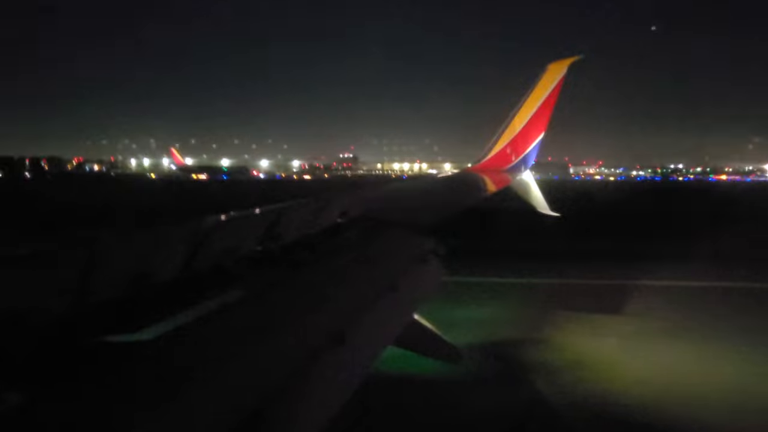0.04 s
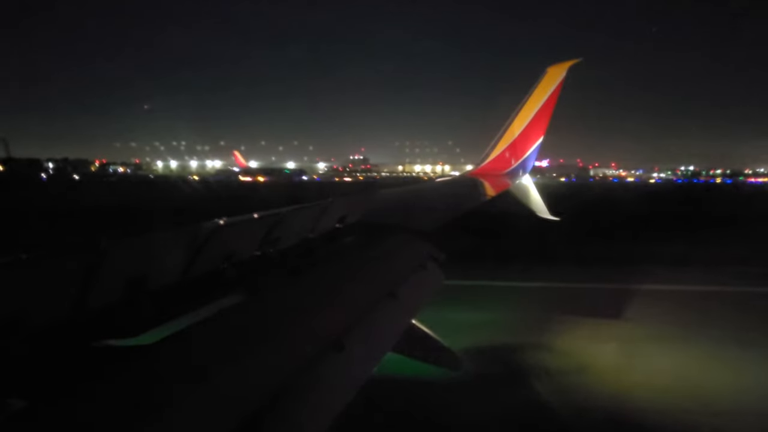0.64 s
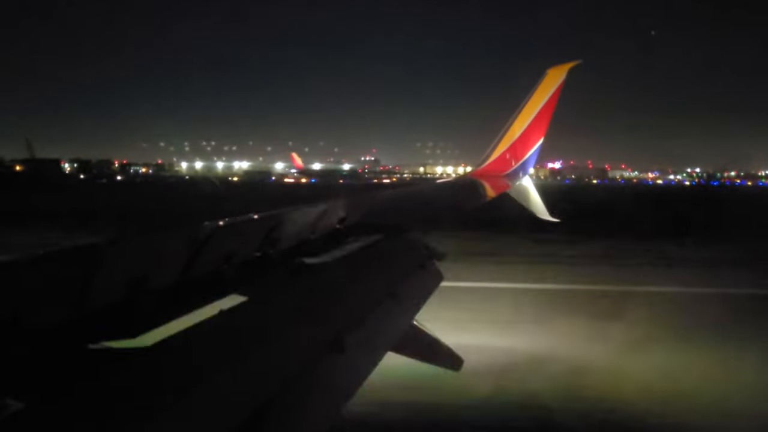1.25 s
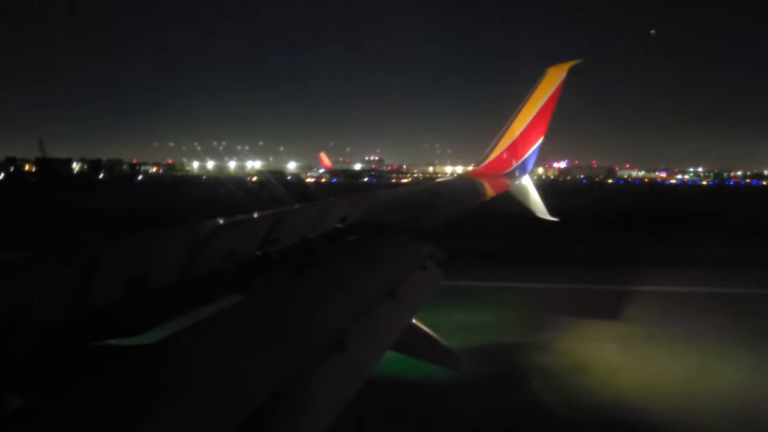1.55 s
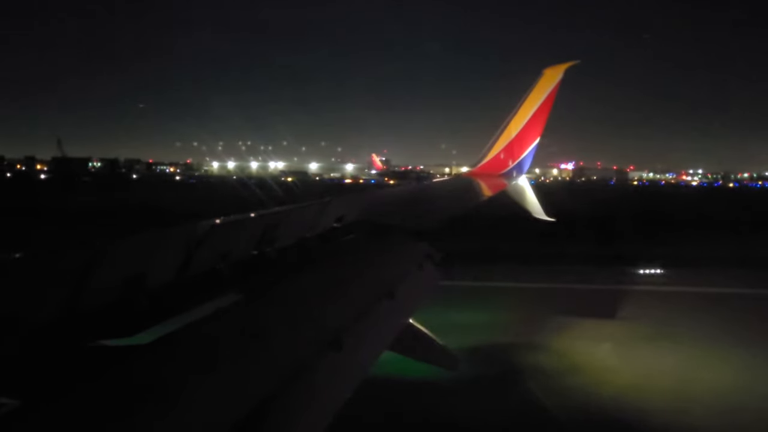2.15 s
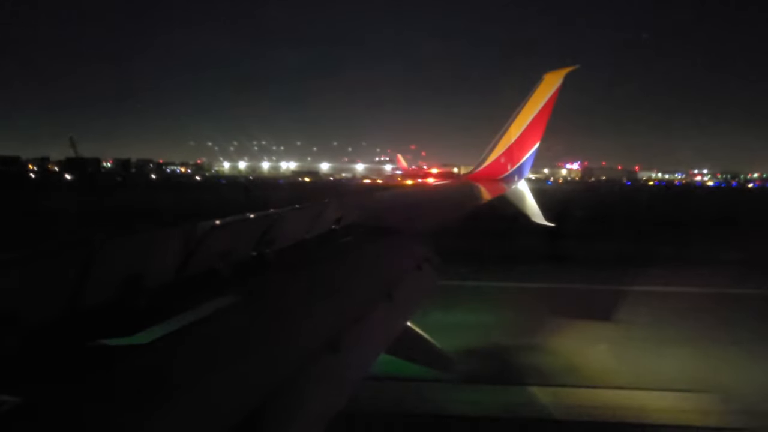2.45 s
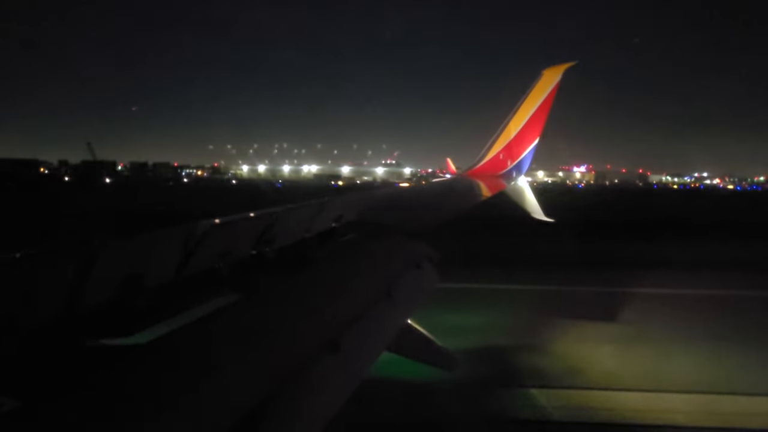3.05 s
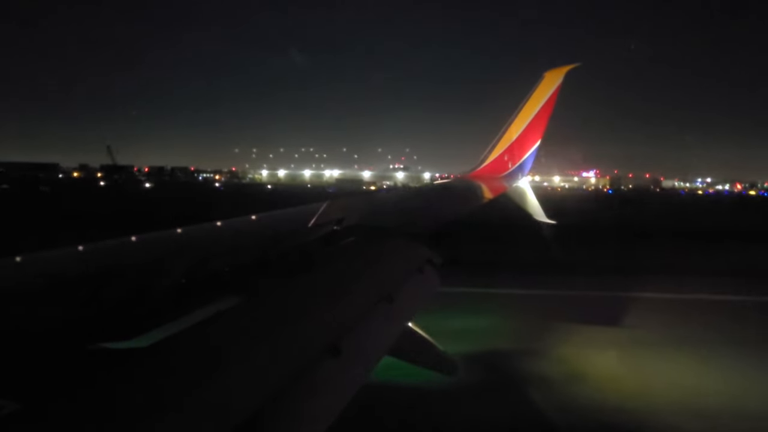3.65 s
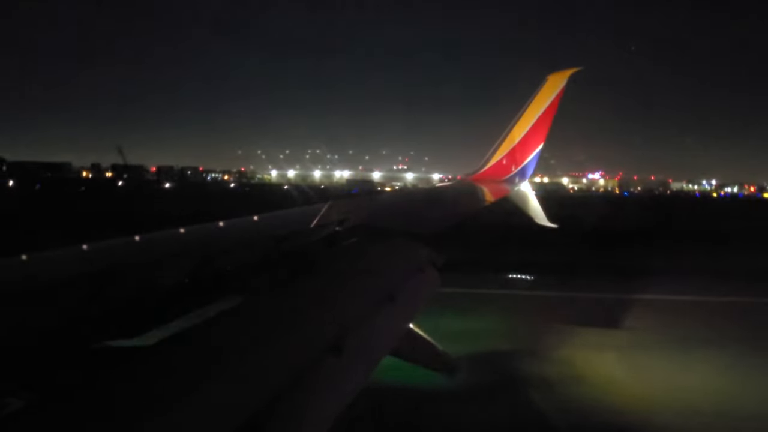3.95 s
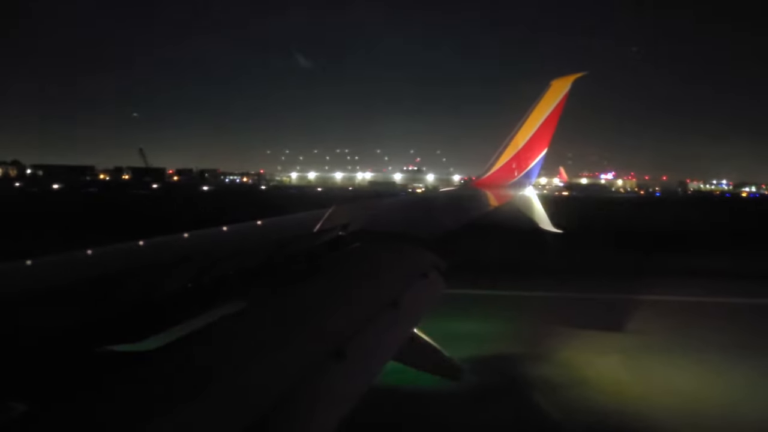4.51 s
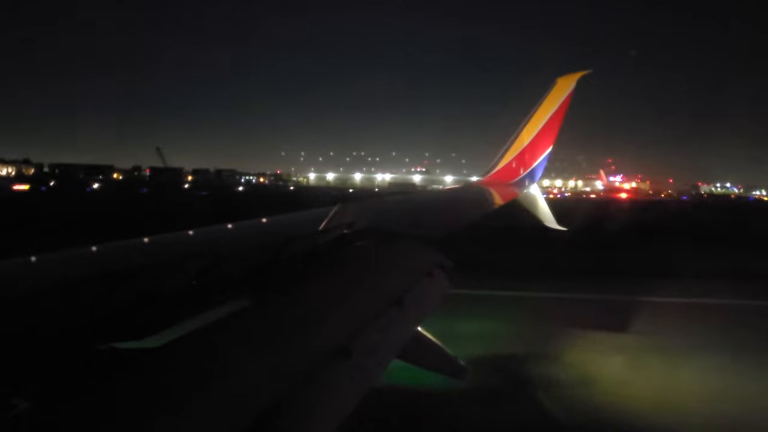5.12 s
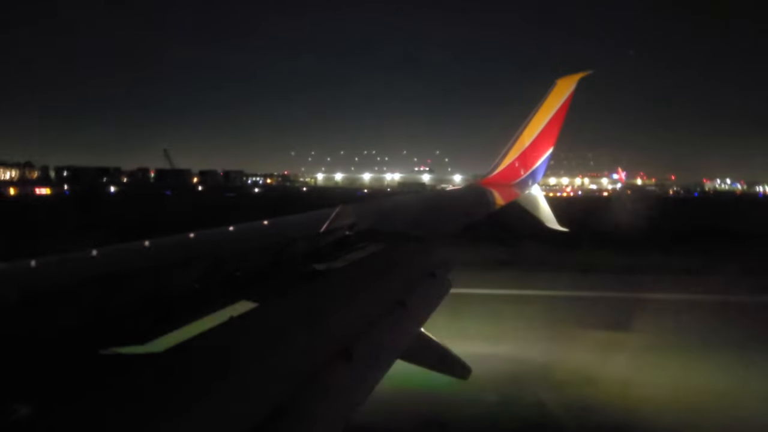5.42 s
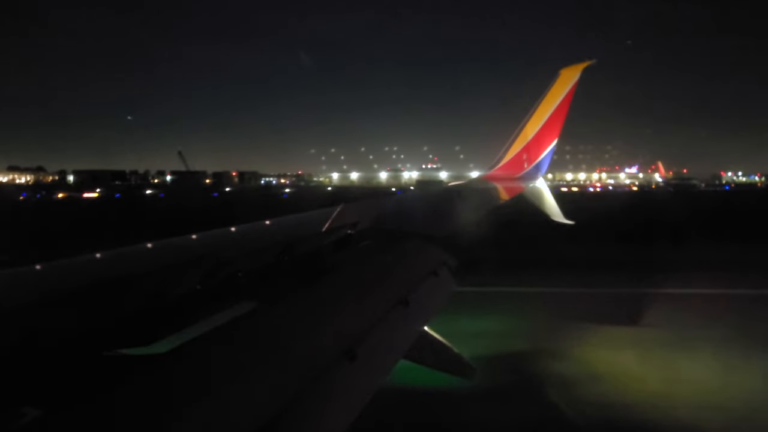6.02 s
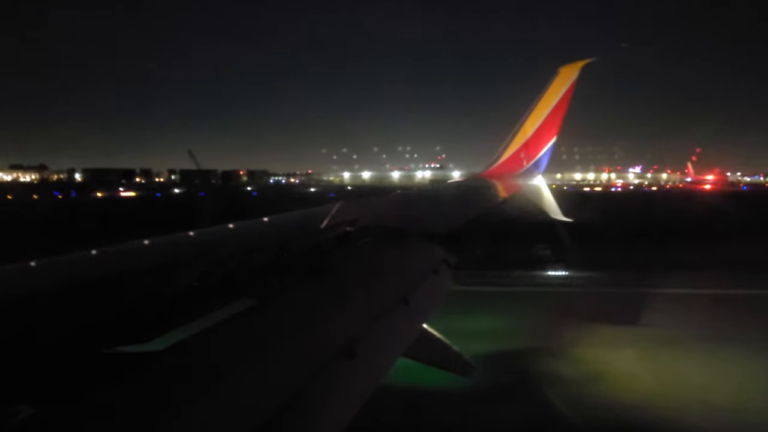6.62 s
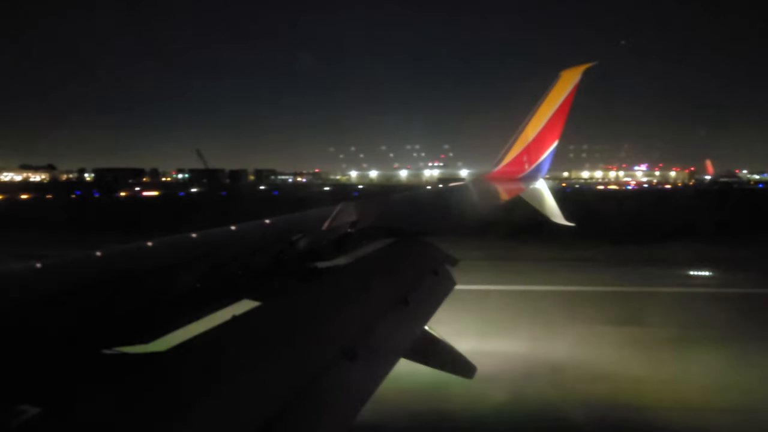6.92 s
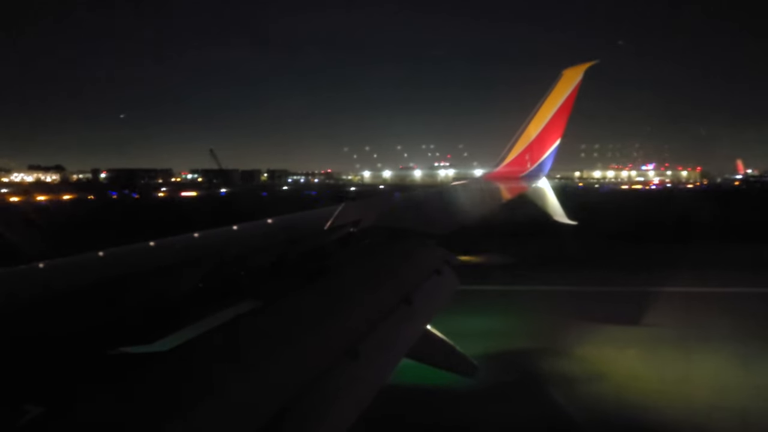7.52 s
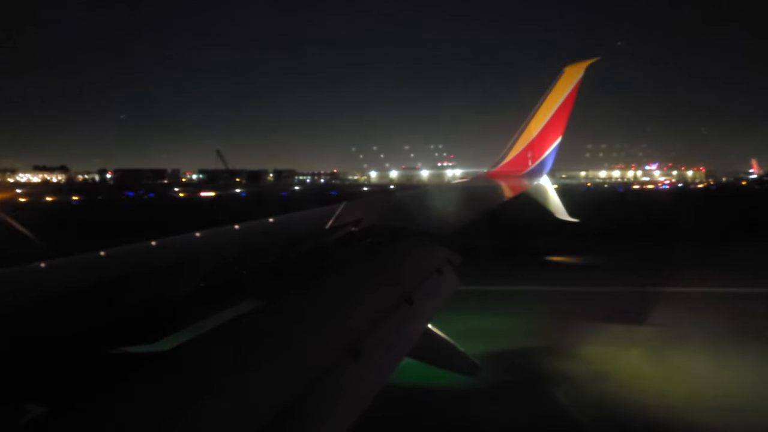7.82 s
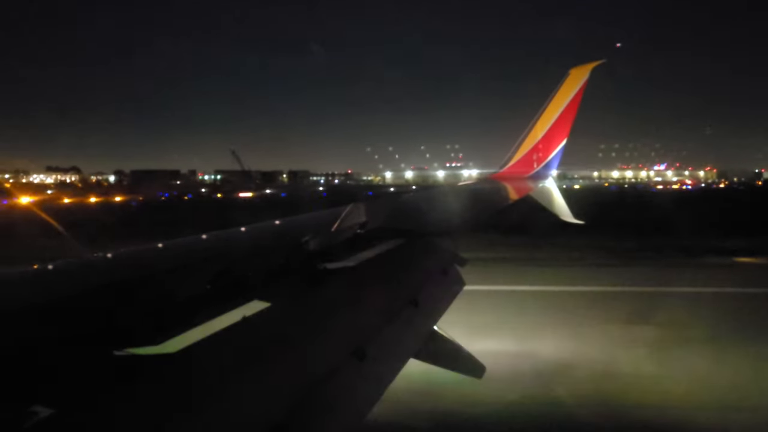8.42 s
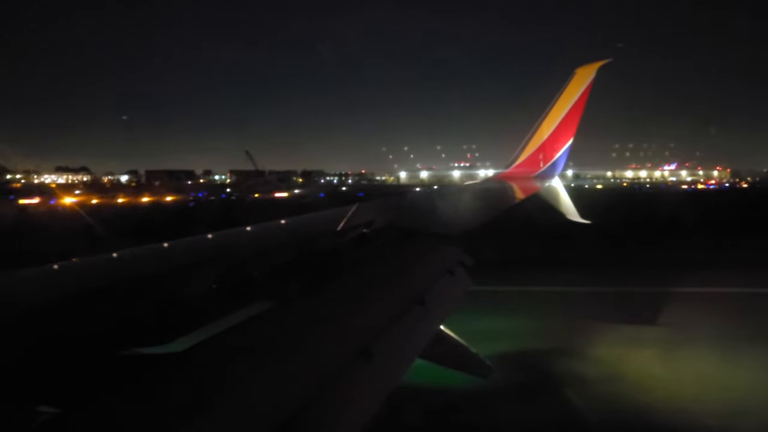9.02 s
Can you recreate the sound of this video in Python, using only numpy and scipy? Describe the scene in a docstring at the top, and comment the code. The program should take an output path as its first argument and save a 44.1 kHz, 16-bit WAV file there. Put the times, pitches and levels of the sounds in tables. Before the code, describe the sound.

A loud, deep wheel rumble and jet engine roar fill an airliner cabin from the start, heard from a seat over the wing as it rolls out after landing. Softer rushing air and vent hiss lie underneath. The rumble continues for all nine seconds or so, swelling briefly over bumps at about 0.6, 2.5, 6, 8 and 8.4 seconds. The roar holds until about 2.6 seconds, then sinks gradually, more clearly after 6 seconds. Meanwhile a low engine fan drone builds between 2 and 4 seconds and stays, swelling and dipping, with a marked dip near 7.7 seconds. Very faint rustles, ticks and short rattles come from the cabin trim throughout, with one tiny creak near 3.8 seconds. A barely audible airy whistle fades in from 5 seconds, and two faint machine hums join at around 8 seconds.

```python
"""Wheel rumble and engine roar, heard from a seat over the wing of a jet airliner rolling out after landing.
The runway shakes the floor; the exhaust roar sinks with the thrust, uncovering the drone of the fans.
Air hisses along the skin and from the vents. The trim rustles, ticks and rattles as the airframe shakes.
A faint whistle and two hums come up toward the end."""
import sys
import numpy as np
from scipy import signal
from scipy.fft import rfft, irfft
from scipy.io import wavfile
from scipy.ndimage import uniform_filter1d, minimum_filter1d

SR = 44100
rng = np.random.default_rng(int(sys.argv[2]) if len(sys.argv) > 2 else 0)


def wrap_up_sound(samples):
    """Save the sound to the file named by the first command line argument, as 16-bit audio."""
    columns = np.atleast_2d(samples).T
    # keep every value between -1 and 1, then stretch to whole-number steps
    tamed = np.clip(columns, -1, 1)
    steps = np.round(tamed * 32767).astype(np.int16)
    wavfile.write(sys.argv[1], SR, steps)


N = 408366
TIME_S = np.arange(N) / SR
BINS_HZ = np.maximum(np.arange(N // 2 + 1) * SR / N, 1)

# Noise spectra. Each row: frequency in Hz, relative density in dB.
WHEEL_SPECTRUM = [(10, -33.5), (25, -26), (30, -20.5), (36, -12), (44, -2), (51, 1.5), (60, -1), (71, 6),
                  (82, -6.5), (95, -7.5), (115, -15.5), (170, -68.5)]
BOOM_SPECTRUM = [(55, -39), (80, -10), (97, 0.5), (122, 4), (145, -3.5), (160, 0.5), (198, -0.5), (220, -4),
                 (250, -26), (330, -67.5)]
ROAR_SPECTRUM = [(140, -43.5), (195, -13.5), (220, 2.5), (242, -0.5), (275, -5.5), (335, -5), (385, -13.5),
                 (430, -16.5), (515, -24), (590, -31.5), (650, -29.5), (720, -39), (1000, -49.5),
                 (2000, -95)]
RUSH_SPECTRUM = [(300, -23.5), (480, 3.5), (600, 6.5), (720, 0), (830, 2), (980, -4), (1090, -3),
                 (1260, -6), (1430, -4), (1700, -8), (2070, -11), (2300, -15), (2700, -35), (5000, -59.5)]
HISS_SPECTRUM = [(1500, -31), (2100, 3), (2450, 2.5), (3300, 2), (4400, -3.5), (5300, -8.5), (6300, -16),
                 (7400, -22.5), (8400, -29.5), (10000, -35.5), (16000, -53.5)]
VENT_SPECTRUM = [(1500, -13.5), (1900, 3), (2080, 10), (2300, -4.5), (3200, -2), (5200, -3), (6300, -7),
                 (7400, -10.5), (8400, -21.5), (11000, -40.5)]
RUSTLE_SPECTRUM = [(4000, -22), (7400, -2.5), (8600, -5), (9400, -1.5), (11700, 0.6), (14000, -2.5),
                   (15700, 0), (17000, -24)]
TICK_SPECTRUM = [(1500, -17.5), (3500, -1), (6000, -3.5), (8500, -11.5), (11000, -7), (13500, -2.5),
                 (15500, 1), (17000, -19.5)]
RATTLE_SPECTRUM = [(2500, -9), (4500, -0.5), (6500, -3), (8000, -14), (10000, -34.5)]
# Cabin sound field. Each row: frequency in Hz, coherence between ears from 0 to 1, left minus right in dB.
EAR_COHERENCE = [(59.7, 0.98, -1.9), (120, 0.96, -1), (226, 1, 0), (354, 0.92, -3), (424, .76, -4.5),
                 (536, 0.2, -3.5), (650, 0, 0), (754, 0.2, 2), (880, 0, 0.5), (1100, 0.2, -2),
                 (1270, 0.5, -4), (1650, 0.1, -2.5), (1980, 0.1, -7), (2450, .08, 0.2), (3600, .06, -4),
                 (7200, 0, -0.5), (8800, 0, 2.5), (12300, .05, 2.5), (15500, 0.3, 2)]
# Phase between ears. Each row: frequency in Hz, left lead in radians.
EAR_PHASE = [(25, .38), (60, .47), (120, .27), (220, .09), (430, .13), (520, 1.6), (640, 1.4), (750, 2.3),
             (880, 1), (1080, .3), (1290, 3)]
# Runway roughness. Each row: time in seconds, shaking level in dB.
ROUGHNESS_CURVE = [(0, -12.5), (1.2, -14), (2.9, -14.9), (3.7, -17), (4.7, -14), (5.4, -17.5), (6.2, -14),
                   (7.5, -15), (8.2, -13.5), (9.26, -14.5)]
# Runway bumps. Each row: centre in seconds, wheel lift in dB, exhaust lift in dB.
RUNWAY_BUMPS = [(.6, 4, 1.5), (2.43, 2, 4), (2.87, 2.5, 2), (5.82, 4.5, 1), (7.97, 4.5, 1.5),
                (8.42, 5.5, 0)]
# Engine thrust. Each row: time in seconds, level in dB.
THRUST_CURVE = [(0, -14), (2.6, -14), (3.5, -17.5), (4.0, -17), (5.0, -16), (5.6, -17), (6.1, -21),
                (6.5, -20), (7.0, -22.5), (8.0, -23), (8.6, -25.5), (9.26, -26)]
# Swells and dips of the fan drone. Each row: centre in seconds, change in dB, width in seconds.
FAN_SWELLS = [(2.5, 5.5, 0.15), (3.4, 4, 0.096), (3.95, -7, 0.38), (5.3, -5, .45), (5.72, 4, .12),
              (7.67, -12, 0.27), (7.88, 2.5, 0.21), (8.64, -4.5, 0.33), (9.03, 1.5, 0.11)]
# Engine whines. Each row: multiple of the drone, initial level in dB, wander in Hz, right phase in radians.
FAN_WHINES = [(2, -52, 5.9, -1.2), (5.02, -62, 10, -0.98), (9.75, -67, 45, -2.1), (13.97, -73, 2.2, -1.7)]
# Panel chafes. Each row: centre in seconds, rustle lift in dB, width in seconds.
PANEL_CHAFES = [(.19, 3, .13), (.99, 2.5, .1), (1.39, 2, .14), (1.74, 1.5, .1), (2.46, 4, 0.13),
                (2.9, 3, 0.1), (5.3, 3, .2), (8.13, 3.5, 0.14)]
# Trim ticks. Each row: start in seconds, level in dB, left minus right in dB, 60 dB decay in seconds.
TRIM_TICKS = [(.369, -61, 0, .015), (.396, -61, 0, .015), (.654, -56.5, 2, .02), (.678, -60, 2, .03),
              (1.44, -62, 2, .03), (1.722, -62.5, 2, .07), (2.79, -61, 2, .03), (2.93, -63, 1, .05),
              (3.232, -59, -3, .03), (6.357, -57, 8, .035), (6.724, -55, 14, .07), (7.702, -57, 13, .035)]
# Panel rattles. Each row: centre in seconds, level in dB, width in seconds.
PANEL_RATTLES = [(1.728, -60, .04), (5.152, -66.5, 0.044), (5.27, -65, .04), (6.73, -65, .04),
                 (7.41, -67, .03), (7.71, -63.5, .025), (8.27, -64, 0.027), (8.412, -63, .03)]
# Machine hums. Each row: frequency in Hz, level in dB.
MACHINE_HUMS = [(440, -45.5), (531, -51.5)]

BUMP_WIDTH_S = 0.081


def from_db(db):
    """Decibels to gain."""
    return 10 ** (np.asarray(db) / 20)


def unit_rms(x):
    """Scale so the channel mean has rms 1."""
    return x / np.sqrt(np.mean(np.atleast_2d(x).mean(axis=0) ** 2) + 1e-20)


def per_sample(rows):
    """Interpolate a curve over time."""
    return np.interp(TIME_S, *np.transpose(rows))


def per_bin(rows):
    """Interpolate each column over log frequency."""
    hz, *columns = np.transpose(rows)
    return [np.interp(np.log(BINS_HZ), np.log(hz), column) for column in columns]


def spectrum_gain(spectrum):
    """Gain per bin, low-passed an octave above the last row."""
    return from_db(per_bin(spectrum)[0]) / (1 + (BINS_HZ / spectrum[-1][0] / 2) ** 8)


def drift(rate_hz):
    """Smooth random signal, rms 1."""
    return unit_rms(irfft(rfft(rng.standard_normal(N)) / (1 + (BINS_HZ / rate_hz) ** 2) ** 2, N))


def bell(at_s, width_s):
    """Gaussian of height 1; width at half height."""
    return .5 ** np.minimum((2 * (TIME_S - at_s) / width_s) ** 2, 20)


def swells_db(rows):
    """Sum of bell-shaped level changes."""
    return sum(db * bell(at_s, width_s) for at_s, db, width_s in rows)


def pan_gains(pan_db):
    """Left and right gains for a level difference."""
    return from_db(np.array([[.5], [-.5]]) * pan_db)


def cabin_noise(spectrum):
    """Stereo noise: long waves reach both ears alike, short ones come from all around."""
    coherence, pan_db = per_bin(EAR_COHERENCE)
    coherence = np.clip(coherence, 0, 1)
    lead_rad, = per_bin(EAR_PHASE)
    left, independent = rfft(rng.standard_normal((2, N)))
    right = (coherence * left + np.sqrt(1 - coherence ** 2) * independent) * np.exp(-1j * lead_rad)
    return unit_rms(irfft(np.array([left, right]) * pan_gains(pan_db) * spectrum_gain(spectrum), N))


def steadied(x, span_s):
    """Even out swells slower than the span."""
    size = int(span_s * SR)
    power = uniform_filter1d(uniform_filter1d(x.mean(axis=0) ** 2, size), size)
    return x / np.sqrt(np.maximum(power, 1e-12))


def tone(hz, wander_hz, right_rad):
    """Stereo sine with wandering pitch, rms 1."""
    phase_rad = 2 * np.pi * np.cumsum(hz + wander_hz * drift(rate_hz=25)) / SR
    return np.sqrt(2) * np.sin(phase_rad + np.array([[0], [1]]) * right_rad)


def shaking_db(usual_db=-15):
    """Airframe shaking relative to the usual."""
    return per_sample(ROUGHNESS_CURVE) - usual_db


def thrust_db(full_db=-14):
    """Thrust relative to full."""
    return per_sample(THRUST_CURVE) - full_db


def wheels(base_db=-18):
    """The runway shakes the gear; the fuselage booms in its lowest modes."""
    bumps_db = swells_db((at_s, db, BUMP_WIDTH_S) for at_s, db, _ in RUNWAY_BUMPS)
    rumble = steadied(cabin_noise(WHEEL_SPECTRUM), span_s=0.16)
    return from_db(base_db + shaking_db() + bumps_db) * rumble


def exhaust(boom_db=-15, roar_db=-15):
    """Jet turbulence through the cabin wall; falls with thrust, surges at bumps."""
    bumps_db = swells_db((at_s, db, BUMP_WIDTH_S) for at_s, _, db in RUNWAY_BUMPS)
    boom = from_db(boom_db + 0.95 * thrust_db()) * steadied(cabin_noise(BOOM_SPECTRUM), span_s=0.2)
    roar = from_db(roar_db + thrust_db()) * steadied(cabin_noise(ROAR_SPECTRUM), span_s=0.75)
    return from_db(bumps_db) * (boom + roar)


def fans(start_hz=216.04, sag_hz_per_s=.44):
    """Slowing fans shake the wing: a building drone, a late third harmonic, thin whines."""
    pitch_hz = start_hz - sag_hz_per_s * TIME_S
    drone_db = np.interp(TIME_S, [1.8, 3.87], [-24, -15.5]) + swells_db(FAN_SWELLS)
    drone = from_db(drone_db + 1.1 * drift(rate_hz=11)) * tone(pitch_hz, wander_hz=.9, right_rad=-0.097)
    third_db = np.interp(TIME_S, [4.5, 8.15, 8.6], [-56.5, -45, -60.5]) + 2.2 * drift(rate_hz=14)
    third = from_db(third_db) * tone(3 * pitch_hz, wander_hz=3.5, right_rad=-1.2)
    fade_db = np.interp(TIME_S, [4.5, 9.26], [0, -3])
    whines = np.zeros((2, N))
    for multiple, level_db, wander_hz, right_rad in FAN_WHINES:
        gain = from_db(level_db + fade_db + 2.5 * drift(rate_hz=20))
        whines += gain * tone(multiple * pitch_hz, wander_hz, right_rad)
    return drone + third + whines


def skin_air(rush_db=-42.5, hiss_db=-56):
    """Air flutters along the skin; follows thrust and shaking."""
    buffet_db = 0.22 * shaking_db() + 0.66 * drift(rate_hz=27)
    rush = from_db(rush_db + .46 * thrust_db() + buffet_db) * cabin_noise(RUSH_SPECTRUM)
    hiss = from_db(hiss_db + .45 * thrust_db() + buffet_db) * cabin_noise(HISS_SPECTRUM)
    return rush + hiss


def vents(level_db=-59.5):
    """Steady air conditioning, peaking near 2 kHz."""
    return from_db(level_db) * cabin_noise(VENT_SPECTRUM)


def rustle(base_db=-71, slip_decay_s=.002):
    """Shaken panels chafe in tiny random slips that thin out as the aircraft slows."""
    slips_per_s = np.interp(TIME_S, [0, 3, 4, 9.26], [60, 60, 25, 18])
    slips = (rng.random(N) < slips_per_s / SR) * np.minimum(rng.exponential(.5, N), 1.6)
    bursts = signal.lfilter([1], [1, -np.exp(-1 / (slip_decay_s * SR))], slips + 1e-18)
    chafing = unit_rms((1 + bursts) * from_db(.6 * drift(rate_hz=60)))
    level_db = base_db + .7 * shaking_db() + swells_db(PANEL_CHAFES)
    return from_db(level_db) * chafing * cabin_noise(RUSTLE_SPECTRUM)


def ticks():
    """Loose fittings slip, each with a short, bright tick."""
    noise = unit_rms(irfft(rfft(rng.standard_normal((2, N))) * spectrum_gain(TICK_SPECTRUM), N))
    envelope = np.zeros((2, N))
    for start_s, level_db, pan_db, t60_s in TRIM_TICKS:
        start = int(start_s * SR)
        decay_db = 60 * np.minimum(TIME_S[:N - start] / t60_s, 2)
        envelope[:, start:] += pan_gains(pan_db) * from_db(level_db - decay_db)
    return envelope * noise


def rattles():
    """A loose panel chatters in short, uneven bursts."""
    bursts = sum(from_db(db) * bell(at_s, width_s) for at_s, db, width_s in PANEL_RATTLES)
    return bursts * from_db(3.7 * drift(rate_hz=200)) * cabin_noise(RATTLE_SPECTRUM)


def squeak(at_s=3.8, width_s=.035, hz=2880, level_db=-59.5):
    """One tiny, rough creak of a fitting."""
    envelope = bell(at_s, width_s) * from_db(level_db + 4 * drift(rate_hz=390))
    return envelope * tone(hz, wander_hz=200, right_rad=-1)


def whistle(hz=2050, level_db=-65.5):
    """An airy whistle fades in over the second half."""
    envelope = np.interp(TIME_S, [5, 7.5], [0, 1]) * from_db(level_db + 3 * drift(rate_hz=40))
    return envelope * tone(hz, wander_hz=39.1, right_rad=-1.3)


def hums():
    """Two faint machine hums rise near the end of the roll."""
    fade_in = np.interp(TIME_S, [7.9, 8.6], [0, 1])
    return fade_in * sum(from_db(db + 2.8 * drift(rate_hz=12)) * tone(hz, wander_hz=2.2, right_rad=-0.37)
                         for hz, db in MACHINE_HUMS)


def scene():
    """Stereo mix at the seat."""
    machinery = exhaust() + fans() + hums()
    airflow = skin_air() + vents() + whistle()
    return wheels() + machinery + airflow + rustle() + ticks() + rattles() + squeak()


def record(dry):
    """Look-ahead limiter, end fades, low-pass."""
    window_samples, fade_s, cutoff_hz = 441, .001, 15800
    headroom = np.minimum(1, 1 / (np.abs(dry).max(axis=0) + 1e-9))
    held = minimum_filter1d(headroom, 2 * window_samples)
    gain = uniform_filter1d(uniform_filter1d(held, window_samples), window_samples)
    fades = np.minimum(1, np.minimum(TIME_S, TIME_S[::-1]) / fade_s)
    lowpass = signal.ellip(10, .1, 80, cutoff_hz, fs=SR, output="sos")
    return signal.sosfilt(lowpass, dry * gain * fades)


dry = scene()
out = record(dry)
wrap_up_sound(out)
```